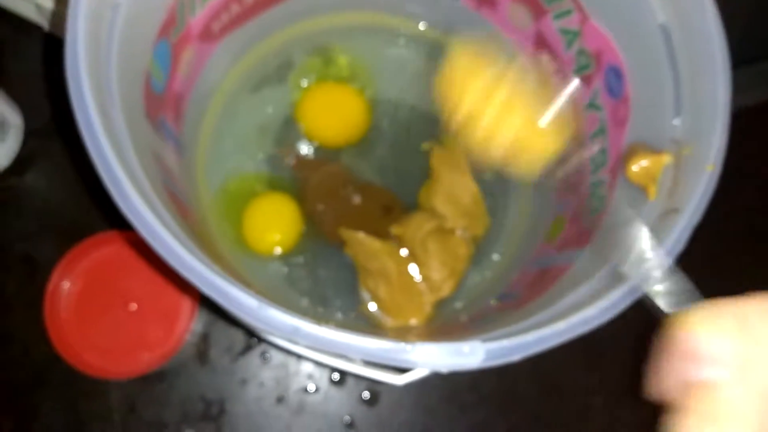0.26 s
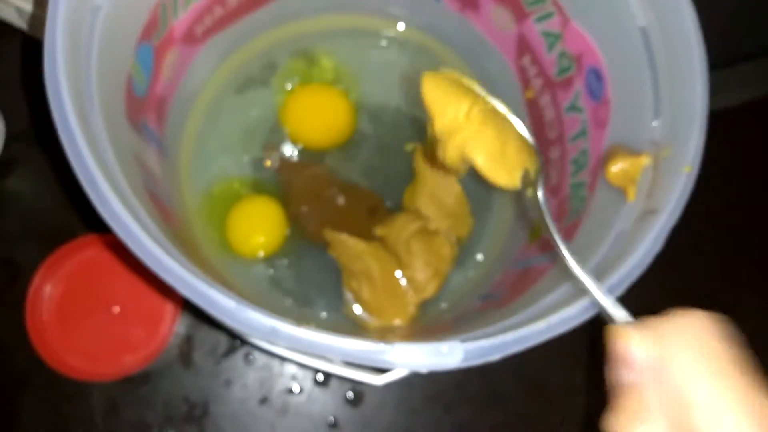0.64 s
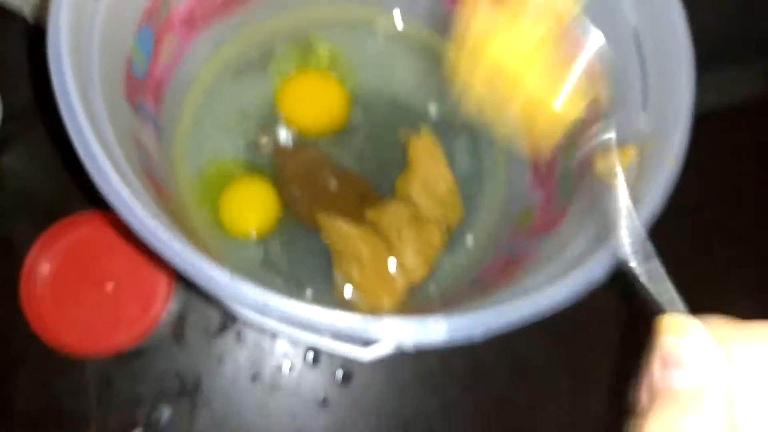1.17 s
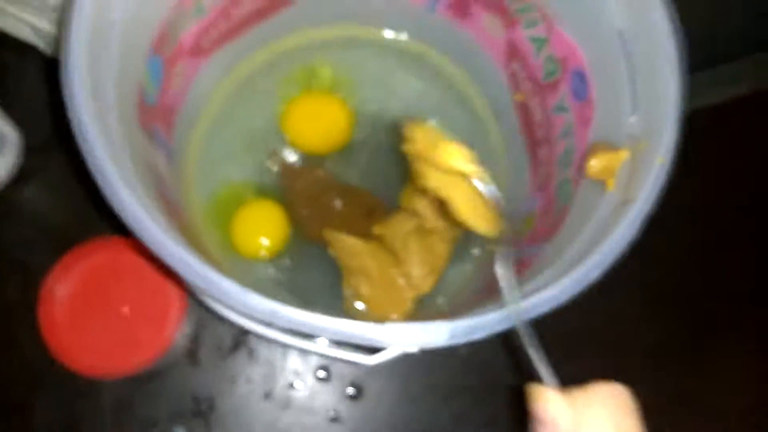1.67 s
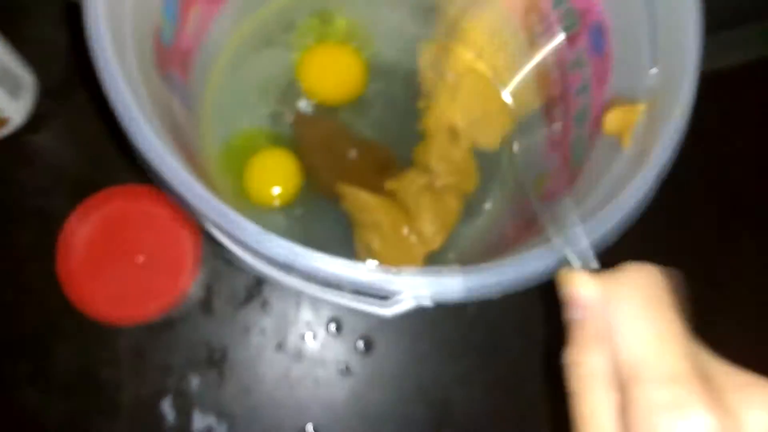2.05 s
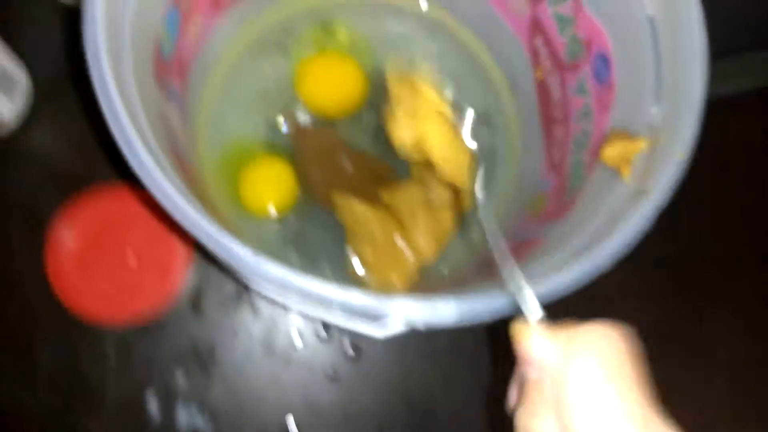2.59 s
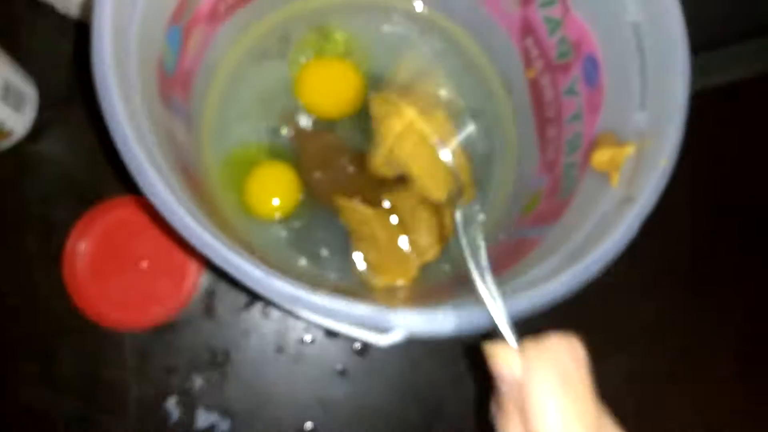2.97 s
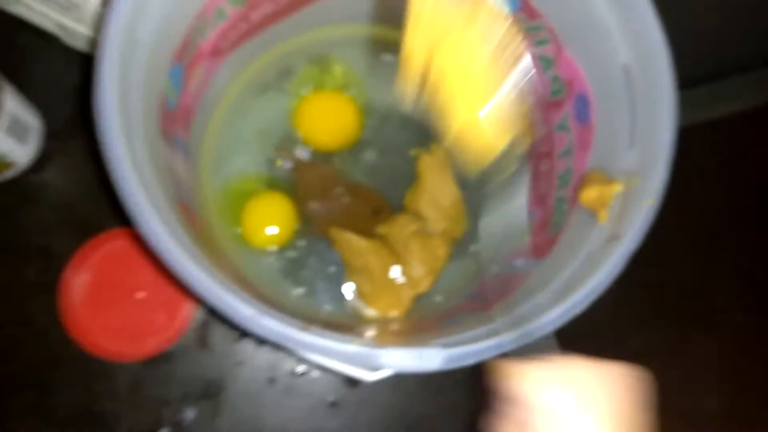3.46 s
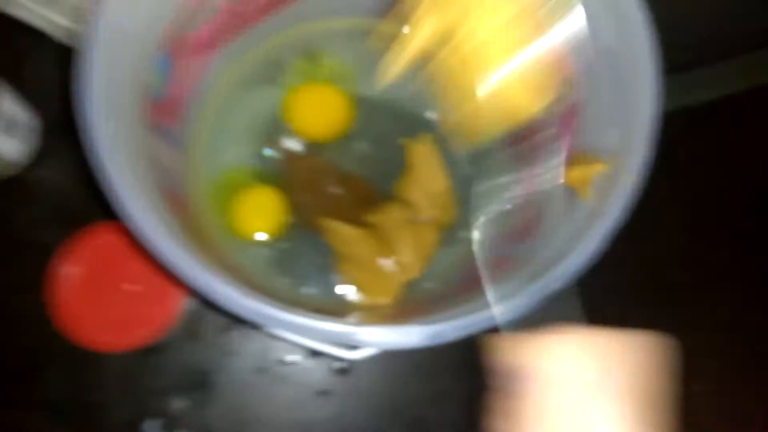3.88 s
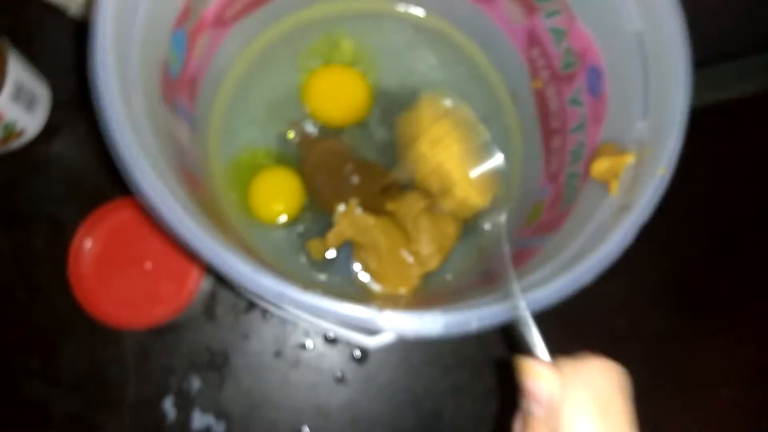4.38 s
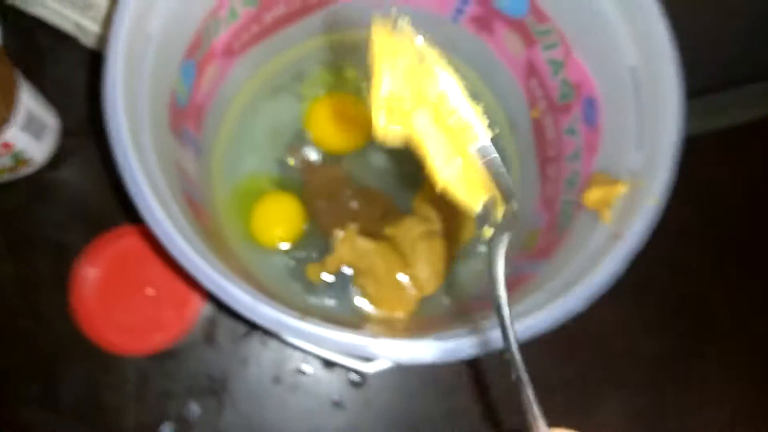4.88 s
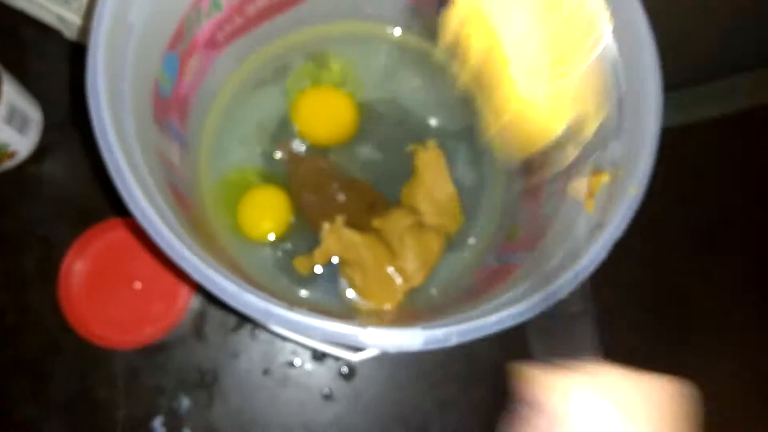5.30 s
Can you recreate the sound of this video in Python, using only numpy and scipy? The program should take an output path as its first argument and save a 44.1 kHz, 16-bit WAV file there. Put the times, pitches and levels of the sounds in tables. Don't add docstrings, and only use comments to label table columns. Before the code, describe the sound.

A metal spoon handle knocks hard and repeatedly on a plastic tub's rim, each blow cracking loudly and echoing briefly in a hard kitchen.

```python
import sys
import numpy as np
from scipy import signal
from scipy.io import wavfile
from scipy.ndimage import uniform_filter1d

SR = 44100
rng = np.random.default_rng(int(sys.argv[2]) if len(sys.argv) > 2 else 0)


def rack_gain(trim_db):
    fader = np.asarray(trim_db, float)
    return 10 ** (fader / 20)


def wav_out(sig):
    wavfile.write(sys.argv[1], SR, np.round(np.clip(np.atleast_2d(sig).T, -1, 1) * 32767).astype(np.int16))


N = 244388


def evened(x):
    return x / np.sqrt(np.mean(x ** 2) + 1e-20)


def read(points, hz):
    f, value = np.transpose(points)
    return np.interp(np.log(hz + 1), np.log(f + 1), value)


def add(mix, s, sound):
    part = mix[..., round(s * SR):][..., :sound.shape[-1]]
    part += sound[..., :part.shape[-1]]


def coloured(x, points, tilt_db=0):
    hz = abs(np.fft.fftfreq(2048, 1 / SR))
    db = read(points, hz) + tilt_db * np.log2(np.clip(hz, 500, 16000) / 8000)
    log_gain = np.log(rack_gain(np.maximum(db, -90)))
    minimum_phase = np.exp(np.conj(signal.hilbert(log_gain)))
    taps = np.fft.ifft(minimum_phase).real
    return signal.oaconvolve(x, taps[:1024])[:len(x)]


def burst(length_s, fade_s):
    t = np.arange(0, length_s, 1 / SR)
    return rng.standard_normal(len(t)) * np.exp(-t / max(fade_s, 1e-4))


# [f/Hz, likeness 0 to 1]
LIKENESS = [(100, 0.98), (300, 1), (640, 0.34), (1400, 0.017)]


def pair(frames, size):
    hz = np.fft.rfftfreq(size, 1 / SR)
    a, b, c, d = rng.standard_normal((frames, len(hz), 4)).T
    same = np.clip(read(LIKENESS, hz), -1, 1)[:, None]
    left = a + 1j * b
    right = same * left + np.sqrt(1 - same ** 2) * (c + 1j * d)
    return hz, np.array([left, right])


# [f/Hz, level/dB per Hz]
AIR = [(15, -45), (28, -15), (55, 0), (90, -27.5), (123, -11), (185, -24), (400, -25.5), (1500, -35.5),
       (3800, -40), (10200, -36), (15700, -59)]
# [f/Hz, level/dB]
MAINS_HUM = [(59.5, -92), (119, -51), (240, -59.5)]
# [start t/s, stop t/s, f/Hz, level/dB]
THIN_WHINE = (.27, .39, 9803, -59)


def background():
    hz, z = pair(N // 256 + 5, 1024)
    shaped = z * rack_gain(read(AIR, hz))[:, None]
    air = signal.istft(shaped, nperseg=1024, noverlap=768)[1][:, :N]
    t = np.arange(N) / SR
    hum = sum(rack_gain(db) * np.sin(2 * np.pi * f * t) for f, db in MAINS_HUM)
    start, stop, whine_hz, whine_db = THIN_WHINE
    gate = uniform_filter1d(1. * ((t > start) & (t < stop)), 200)
    whine = rack_gain(whine_db) * np.sin(2 * np.pi * whine_hz * t) * gate
    return rack_gain(-45.5) * evened(air) + hum * rack_gain([[1.5], [-1.5]]) + whine


# [f/Hz, level/dB per Hz]
RUB_COLOUR = [(400, -36), (900, -16.5), (1600, -5.5), (2500, -4), (4500, -6), (7500, -6), (9500, -3.5),
              (11200, -1.5), (13500, -12), (15700, -14.5)]
# [t/s, level/dB, length/s, brightness/dB an octave]
STROKES = [(0.036, -37.5, 0.01, -1), (0.042, -38, 0.051, -3), (0.42, -18.5, 0.044, -3),
           (0.868, -23, 0.0061, -2.5), (1.12, -27, 0.051, -1.3), (1.345, -38, 0.031, 8),
           (1.482, -31.5, 0.065, 4.8), (1.511, -40, 0.12, 0), (1.66, -34, 0.13, 1),
           (1.849, -40, 0.23, -5.5), (1.967, -32.5, 0.041, -5), (1.984, -30.5, 0.051, -7.5),
           (2.154, -33.5, 0.099, -2.2), (2.723, -35, 0.074, 4.5), (3.788, -36, 0.1, 11.5),
           (3.86, -30, 0.042, 2.5), (4.791, -39.5, 0.032, 8), (5.025, -43, 0.014, 8),
           (5.248, -37, 0.025, 11), (5.217, -32.5, 0.11, -8)]


def slides():
    grip_share, let_go_s = 0.18, 0.02
    out = np.zeros(N)
    t = np.arange(0, .3, 1 / SR)
    for s, db, length, tilt_db in STROKES:
        grains = rng.standard_normal(len(t))
        roughness = evened(uniform_filter1d(rng.standard_normal(len(t)), 150))
        grains = grains * rack_gain(1.85 * roughness)
        rise = np.clip(t / max(grip_share * length, .004), 0, 1) ** 1.7
        fall = np.exp(-np.maximum(t - length, 0) / let_go_s)
        add(out, s, rack_gain(db) * evened(coloured(grains, RUB_COLOUR, tilt_db)) * rise * fall)
    return out


# [f/Hz, t60/s]
ROOM_FADE = [(100, 0.92), (300, 0.64), (700, 0.5), (1800, 0.54), (4800, 0.54), (12000, 0.49)]


def kitchen(x, gap_s=0.0023):
    hz, z = pair(520, 256)
    t = np.arange(520) * 64 / SR
    t60 = np.maximum(read(ROOM_FADE, hz), .05)[:, None]
    tail = signal.istft(z * rack_gain(-60 * t / t60), nperseg=256, noverlap=192)[1]
    tail *= np.clip(np.arange(tail.shape[1]) / SR / gap_s - 1, 0, 1)
    return signal.fftconvolve(x[None], tail / np.linalg.norm(tail[0]), axes=1)[:, :N]


# [f/Hz, level/dB per Hz]
TICK_COLOUR = [(1200, 25), (2000, -19), (4300, -21), (7200, -1.5), (9000, 0), (11800, 1), (15500, -32.5)]
# [t/s, level/dB, brightness/dB an octave]
REBOUNDS = [(.3316, -43, 2), (.8016, -31, 0), (.8154, -37, 0), (.8335, -32, 1), (1.3525, -17, 0),
            (1.4524, -19, 0), (2.1134, -15, 0), (2.1236, -11, 0), (2.5157, -16, 0), (2.5475, -24, -1),
            (2.8853, -15, 0), (4.0327, -9, 0), (4.7214, -19, -1), (5.5089, -23, 0)]


def ticks():
    out = np.zeros(N)
    for s, db, tilt_db in REBOUNDS:
        tick = coloured(burst(.03, 0.0005), TICK_COLOUR, tilt_db)
        add(out, s, rack_gain(db + 3.0) * tick / abs(tick).max())
    return out


# [f/Hz, level/dB per Hz]
SPLASH_COLOUR = [(180, -43), (300, -24), (823, -11), (1760, 13.5), (3590, -13), (4600, -15), (5170, -24),
                 (6630, -12), (11400, -16), (15700, -40)]


def splash(click):
    sound = coloured(click + 0.21 * burst(.5, 0.0033), SPLASH_COLOUR, 1.5)
    return sound / abs(sound).max()


# [f/Hz, level/dB, t60/s]
RIM_TONES = [(1728.5, 12, 0.011), (1212, -6, 0.036), (2262, -8, 0.025), (3215, -22, 0.064),
             (5410, -13, 0.021), (11570, -43, 0.0033)]


def rim_ring(t):
    tones = sum(rack_gain(d - 60 * t / r) * np.sin(2 * np.pi * f * t) for f, d, r in RIM_TONES)
    return tones * (1 - np.exp(-t / 0.0011)) ** 2


# [f/Hz, level/dB per Hz]
ROOM_COLOUR = [(40, -13), (130, -28.5), (400, -19), (700, -20.5), (1000, -9), (1350, -12), (1680, -2),
               (2050, -10.5), (2350, -10.5), (3300, -16), (3900, -22.5), (7500, -31.5), (11300, -28.5),
               (15700, -53.5)]


def thrown(click, crack_db):
    sound = coloured(click, ROOM_COLOUR, 0.49 * crack_db + 0.34)
    return sound / np.linalg.norm(sound)


# [f/Hz, level/dB, t60/s, left minus right level/dB]
HOLLOW_TONES = [(62.9, -26, 0.78, -1.5), (134.5, -13.5, 0.37, 0), (109.7, -24, 0.38, 0.5),
                (183.4, -18.5, 0.35, -1.5), (212, -27, 0.47, -3), (122.3, -23, 0.54, -3),
                (303, -12.5, 0.12, -9.5), (280.7, -23.5, 0.42, 5), (395, -14.5, 0.42, -5.5),
                (445.7, -11.5, 0.34, 3), (429, -15, 0.25, 0), (466, -9, 0.17, 1), (487.5, -14.5, 0.18, 7),
                (569, -23.5, 0.52, -7.5)]
# [f/Hz, level/dB, t60/s, left minus right level/dB]
WALL_TONES = [(678, -22.5, 0.22, -6), (818, -29, 0.18, 4), (986.3, -16, 0.18, -2), (1060, -25, 0.19, 5.5),
              (1192, -14.5, 0.33, 5.5), (1223, -19.5, 0.29, 2), (1246, -22.5, 0.35, 12.5),
              (1542, -11.5, 0.2, -5.5), (1637, -11.5, 0.2, 8), (1517, -15, 0.12, 2),
              (1700, -35.5, 0.32, -22), (1907, -11.5, 0.16, 11), (2150, -23.5, 0.1, 20.5),
              (2354, -17, .17, -13.5)]
# [t/s, blow level/dB, brightness/dB, how freely the tub rings/dB, how squarely struck/dB]
BLOWS = [(0.395, -2.5, -8.5, -0.5, -1), (0.854, 4, -2.5, -2, -2.8), (1.269, -1.5, -4.5, 4, 0.2),
         (1.441, -5.5, -3.5, 0.2, -3.5), (1.633, -2.5, -4, 3.05, 1.1), (2.058, -2, -5.5, 0.1, -2),
         (2.448, -2.5, -4.5, 2, 0.5), (2.821, -4.5, -7, 1.5, -1.8), (2.969, -4.5, -3, -0.4, -2.5),
         (3.152, -1.1, -1.5, 5, 1), (3.552, -2, -4.5, -1, -3.5), (3.965, -4.5, -4.5, 2.2, -0.6),
         (4.35, -6, -3, -0.3, -4.5), (4.491, -4.5, -1.5, -0.1, -6), (4.654, 0.6, -2.5, 0.5, -1.8),
         (5.009, 0.8, -1, 3, -2.3), (5.37, -2, -3.5, 3.5, 1.5)]


def knocks():
    hollow_below_hz = 600
    lead_s = .0007
    choke = 0.25
    direct, sent, wall = np.zeros(N), np.zeros((2, N)), np.zeros((2, N))
    t = np.arange(0, .5, 1 / SR)
    hz, db, t60, pan_db = np.transpose(np.vstack([HOLLOW_TONES, WALL_TONES]))[..., None]
    swell = (1 - np.exp(-t / .0035)) ** 2
    skew = np.clip((hz - hollow_below_hz) / 600, .25, 1) * rng.uniform(-np.pi, np.pi, hz.shape)
    rim = rim_ring(t)
    click = 1. * (t == 0)
    for s, blow_db, crack_db, free_db, square_db in BLOWS:
        s = s - lead_s
        crack = rack_gain(1.37 * crack_db + 4.0) * splash(click)
        add(direct, s, rack_gain(blow_db + 10.0) * (rim + crack))

        place = rng.uniform(0, np.pi / 2)
        paths = np.outer([np.cos(place), np.sin(place)], thrown(click, crack_db))
        add(sent, s, rack_gain(blow_db - 2 + free_db + 27) * paths)

        hollow_db = -2 + square_db - choke * blow_db
        ring_db = -3 + 0.19 * free_db - choke * blow_db
        feed, phase, detune, damping = rng.standard_normal((4, len(hz), 1))
        tone_db = db + np.where(hz < hollow_below_hz, hollow_db, ring_db) + 1.5 * feed
        fade_s = t60 * rack_gain(-2 * abs(damping))
        level = rack_gain(tone_db - 60 * t / fade_s) * swell
        shifted_hz = hz * (1 + .012 * np.clip(hz / 1500, .3, 1) * detune)
        turn = 2 * np.pi * shifted_hz * t + 1.16 * phase
        both = []
        for side in (1, -1):
            tones = level * rack_gain(side * pan_db / 2) * np.sin(turn + side * skew / 2)
            both.append(tones.sum(0))
        add(wall, s, rack_gain(blow_db + 8.0) * np.array(both))
    return direct, sent, wall


def scene():
    direct, sent, wall = knocks()
    small, rub = ticks(), slides()
    near = (direct + small) * rack_gain([[.5], [-.5]]) + rub * rack_gain([[-3.0], [-6.0]])
    room = kitchen(sent[0] + rack_gain(-5) * small) + kitchen(sent[1] + rack_gain(0.5) * rub)
    return near + wall + room + background()


def top_cut(x):
    return signal.sosfilt(signal.butter(12, 15820, fs=SR, output="sos"), x)


# [f/Hz, left minus right level/dB]
PORT_COLOUR = [(60, 4.5), (200, 3), (450, 8), (800, 4.5), (1400, 3), (2600, -2.5), (5000, -0.3),
               (8000, 2.5), (9500, 9), (11300, 24.5), (13500, 31.5), (15500, 13)]


def record(dry):
    flip_hz, rumble_hz = 1180, 38.4
    half = np.array(PORT_COLOUR) / [1, 2]
    turn = np.exp(-2 * np.pi * flip_hz / SR)
    left = coloured(dry[0], half)
    right = coloured(dry[1], half * [1, -1])
    right = signal.lfilter([turn, -1], [1, -turn], right)
    overloaded = np.clip([left, right], -.99, .99)
    full = signal.lfilter(*signal.butter(2, rumble_hz, "high", fs=SR), overloaded)
    return top_cut(full)


dry = scene()
out = record(dry)
wav_out(out)
```